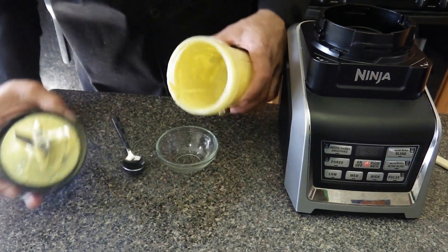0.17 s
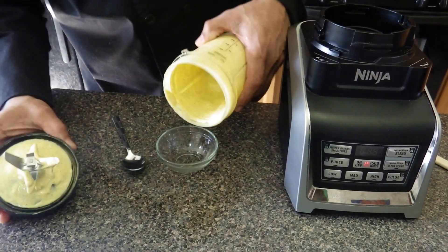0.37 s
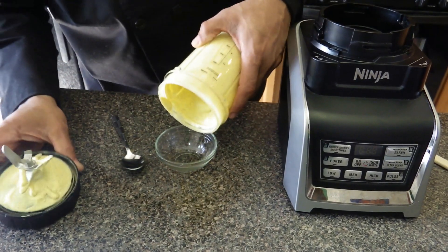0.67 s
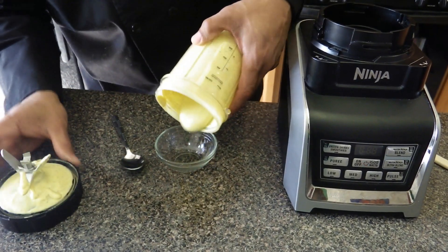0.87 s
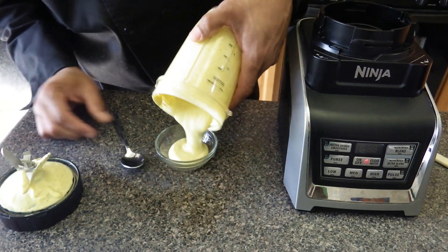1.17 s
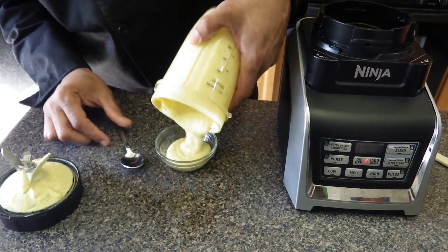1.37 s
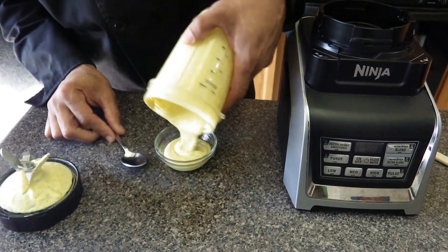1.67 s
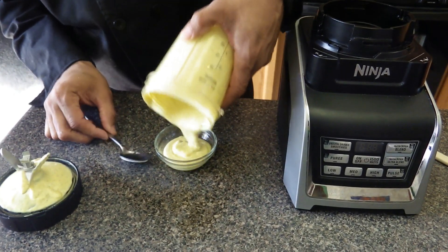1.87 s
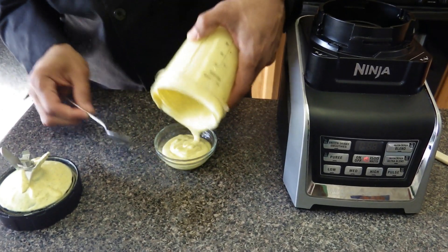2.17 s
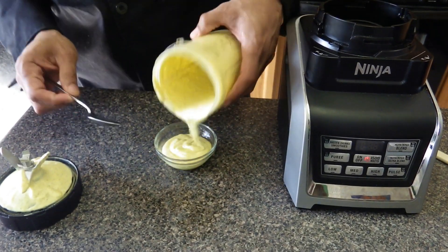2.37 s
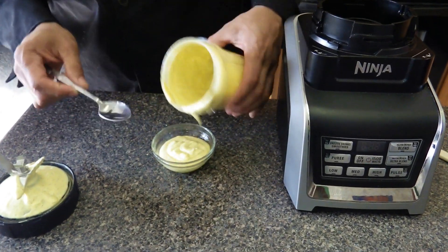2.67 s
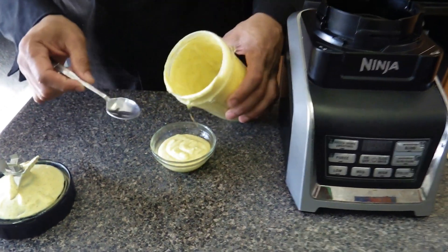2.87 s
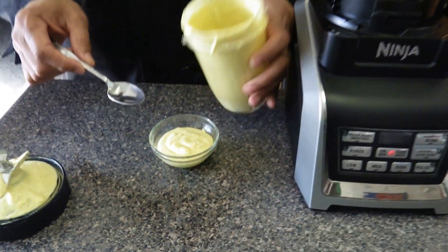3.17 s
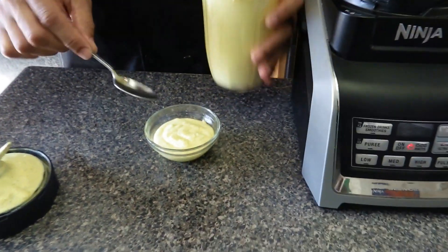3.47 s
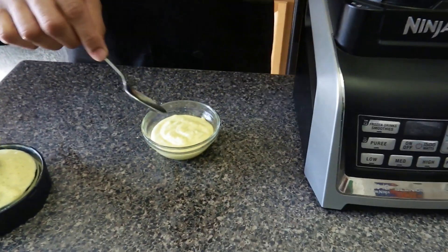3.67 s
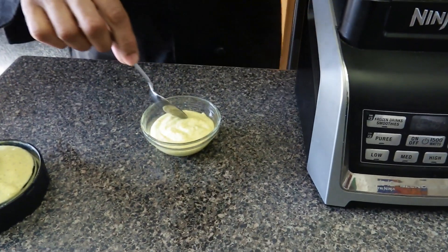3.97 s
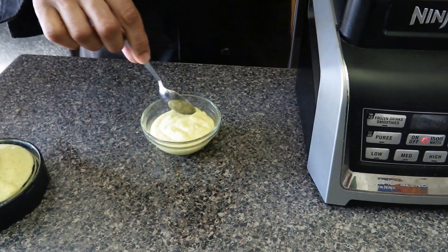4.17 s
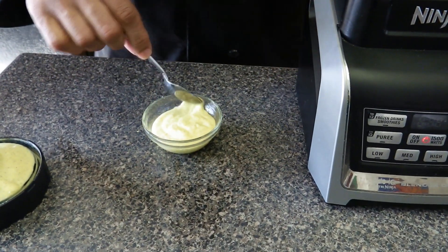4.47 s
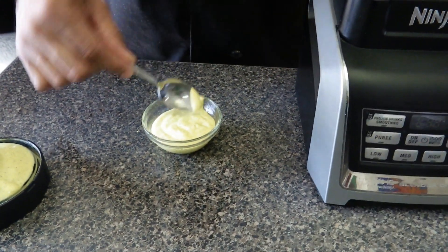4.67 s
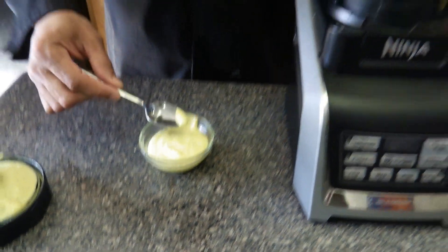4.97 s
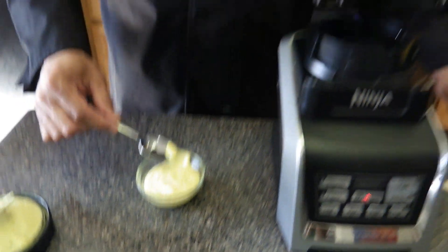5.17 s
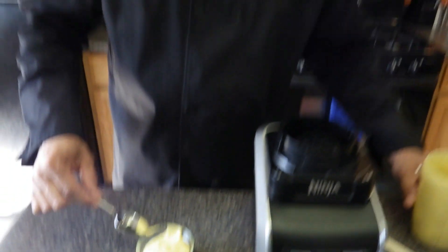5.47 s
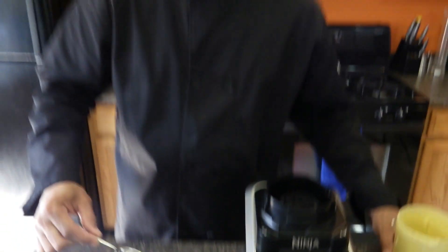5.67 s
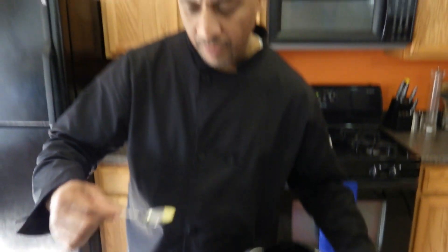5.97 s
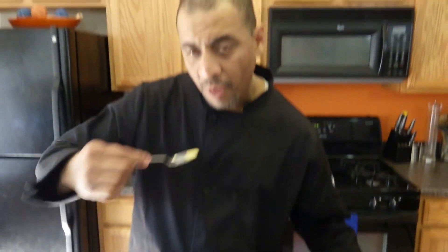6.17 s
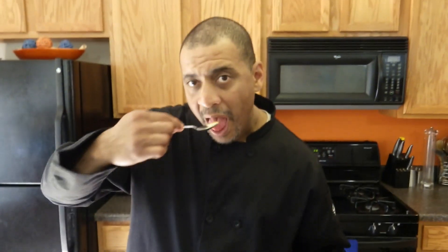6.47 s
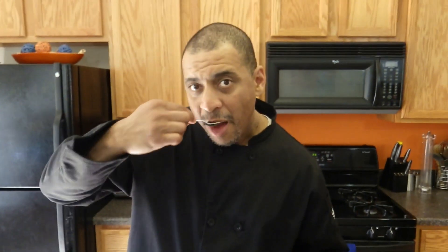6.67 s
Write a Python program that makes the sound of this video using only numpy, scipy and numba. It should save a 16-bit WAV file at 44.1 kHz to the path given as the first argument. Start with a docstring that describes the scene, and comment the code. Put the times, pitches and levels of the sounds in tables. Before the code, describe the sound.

In a small kitchen with a low fridge hum, a plastic lid and cup knock on a counter, then a spoon ticks and clinks sharply on glass.

```python
"""A plastic blender cup and its lid knock on a kitchen counter as struck bodies ringing in damped modes.
A metal spoon slides and ticks, then scrapes faintly and clinks on a small glass bowl, by the same
modal principle. Soft rubs and sleeves are trains of random slips, squeaks are gliding sines, and a
fridge hums in steady lines. One near echo and a diffuse room surround the handling; the recorder's
gain control ducks everything after each loud blow, then creeps back."""
import sys
import numpy as np
from scipy import signal
from scipy.fft import rfft, irfft, next_fast_len
from scipy.io import wavfile
from scipy.ndimage import uniform_filter1d, minimum_filter1d
from numba import njit

SR = 44100
rng = np.random.default_rng(int(sys.argv[2]) if len(sys.argv) > 2 else 0)


def digitize_waveform(pressure):
    """Quantize a signal to 16-bit integers and store it at the path in sys.argv[1].

    Rows of a 2-D input are taken as channels; values are limited to [-1, 1].
    """
    field = np.atleast_2d(pressure).T
    bounded = np.clip(field, -1, 1)
    quanta = np.round(bounded * 32767).astype(np.int16)
    wavfile.write(sys.argv[1], SR, quanta)


N = 300100
TIME = np.arange(N) / SR
BRIEF = TIME[:SR // 2]  # time axis of one decay, 0.5 s


def undb(db):
    """Logarithmic level: decibels to amplitude gain."""
    return 10 ** (np.asarray(db) / 20)


def unit(x):
    """Energy normalisation: the squares sum to one."""
    return x / np.sqrt(np.sum(x ** 2))


def level(x, db):
    """Mean power: scale to an rms level in dB."""
    return unit(x) * np.sqrt(len(x)) * undb(db)


def along(points, hz):
    """Logarithmic pitch scale: interpolate (frequency, value) points on it."""
    point_hz, value = np.transpose(points)
    return np.interp(np.log(np.maximum(hz, 1)), np.log(point_hz), value)


def tint(x, points):
    """Linear filtering: multiply the spectrum of a long sound by a (frequency, level) colour."""
    size = next_fast_len(len(x))
    gain = undb(along(points, np.fft.rfftfreq(size, 1 / SR)))
    return irfft(rfft(x, size) * gain, size)[:len(x)]


def click(points, size=2048):
    """Minimum phase: folding the cepstrum gives the most compact causal pulse of this colour."""
    cepstrum = irfft(np.log(undb(along(points, np.fft.rfftfreq(size, 1 / SR)))))
    cepstrum[1:size // 2] *= 2
    cepstrum[size // 2 + 1:] = 0
    return unit(irfft(np.exp(rfft(cepstrum))))


def fade(t60):
    """Exponential damping: a loss of 60 dB in t60 seconds."""
    return np.exp(-np.log(1000) * BRIEF / t60)


def through(x, response):
    """Superposition: convolve with an impulse response, keeping the length."""
    return signal.fftconvolve(x, response)[:len(x)]


def walk(rate):
    """Random fluctuation: interpolated noise, rate points a second, with a spread near one."""
    steps = rng.standard_normal(4096)
    return np.sqrt(3 / 2) * np.interp(TIME * rate, np.arange(len(steps)), steps)


def add(track, s, x):
    """Superposition: lay a sound into a track at a time in seconds."""
    i = int(s * SR)
    track[i:i + len(x)] += x[:N - i]


def grains(rate, spread_db):
    """Stick-slip noise: random tiny slips of uneven size, rate a second on average."""
    occurs = rng.random(N) < rate / SR
    return occurs * rng.standard_normal(N) * undb(spread_db * rng.exponential(size=N))


def stroke(s, length_s):
    """Friction follows speed: one movement gathers, peaks at s and dies away, 0-1."""
    return np.exp(-(2 * (TIME - s) / length_s) ** 2)


def strokes(table):
    """Friction follows speed: the loudness of a series of movements."""
    return sum(undb(db) * stroke(s, length_s) for s, length_s, db in table)


FOCUS_DB = 13  # loss per octave of the modes away from the ring centre


def ring(modes, centre_hz):
    """Modal superposition: decaying sines, weighted by their distance from a centre frequency."""
    total = 0
    for hz, db, t60 in modes:
        octaves_away = abs(np.log2(hz / centre_hz))
        total = total + undb(db - FOCUS_DB * octaves_away) * fade(t60) * np.sin(2 * np.pi * hz * BRIEF)
    return unit(total)


# Compressor and mains lines: (frequency [Hz], mean level before a common 1 dB cut [dB])
HUM_LINES = [(59.2, -54), (145.3, -49.5), (183.0, -52.5), (220.7, -55), (290.7, -57), (328.4, -58.5),
             (398.4, -62), (436.0, -57), (473.7, -56), (543.7, -60.5), (656.8, -63.5)]
# Colour of the room's steady air: (frequency [Hz], relative level [dB])
AIR_COLOUR = [(13, -35), (22, -19.5), (59, -5.5), (111, -11), (142, -0.5), (187, -11.5), (220, 4),
              (260, -13), (324, -4), (475, -11), (516, -10), (717, -9.5), (779, -17), (5770, -25.5),
              (15500, -36)]
AIR_DB = -44.5  # mean level


def fridge():
    """Line spectrum over broadband noise: compressor and mains lines waver over the room's air."""
    hum = np.zeros(N)
    for hz, db in HUM_LINES:
        amplitude = np.sqrt(2) * undb(db + 0.52 * walk(3.4))
        phase = 2 * np.pi * (hz * TIME + rng.random()) + 0.2 * walk(1.5)
        hum += amplitude * np.sin(phase)
    air = level(tint(rng.standard_normal(N), AIR_COLOUR), AIR_DB)
    return undb(-1.0) * hum + air * undb(0.15 * walk(6.6))


# Reverberation time of the room: (frequency [Hz], t60 [s])
ROOM_T60 = [(100, 0.75), (300, 0.4), (1000, 0.46), (3000, 0.38), (8000, 0.22), (15000, 0.3)]


def kitchen(x):
    """Diffuse reverberation: noise bands build up over a few ms, then decay at their own rates."""
    hz = np.fft.rfftfreq(len(BRIEF), 1 / SR)
    noise = rfft(rng.standard_normal(len(BRIEF)))
    centres_hz, t60s = np.transpose(ROOM_T60)
    tail = np.zeros(len(BRIEF))
    for share, t60 in zip(np.eye(len(t60s)), t60s):
        band = irfft(noise * along(np.c_[centres_hz, share], hz), len(BRIEF))
        tail += band * fade(t60)
    build_up = 1 - np.exp(-(BRIEF / 0.0059) ** 2)
    return through(x, unit(tail * build_up))


# Thin squeaks: (middle [s], length [s], peak amplitude before flutter [dB])
SQUEAKS = [(.2, 0.12, -51), (.36, 0.17, -47.5), (2.34, 0.18, -57), (2.58, 0.15, -56)]
# Their gliding pitch: (time [s], mean frequency [Hz])
SQUEAK_PITCH = [(.12, 5530), (.24, 7100), (.29, 6580), (.42, 6370), (2.33, 4650), (2.46, 4300),
                (2.56, 4620), (2.7, 4250)]


def squeak():
    """Frequency modulation: faint sines glide and tremble as they rise and fall in level."""
    hz = np.interp(TIME, *np.transpose(SQUEAK_PITCH)) * (1 + 0.0073 * walk(300))
    tone = np.sin(2 * np.pi * np.cumsum(hz) / SR)
    return tone * strokes(SQUEAKS) * undb(2.7 * walk(49))


# A sleeve rubs with each arm movement: (middle [s], length [s], level before flutter [dB])
SLEEVE_RUBS = [(.43, 0.58, -46), (1.14, 0.3, -42.5), (2.34, 0.51, -47.5), (3.5, 0.17, -52.5),
               (3.74, 0.17, -47.5), (3.93, 0.2, -55.5), (5.45, .4, -48.5), (6.72, 0.61, -58)]
# Colour of the sleeve: (frequency [Hz], relative level [dB])
CLOTH_COLOUR = [(400, -8.5), (1500, 0.5), (3000, -1), (6000, 4), (8000, -2.5), (10000, -13), (12500, -14),
                (15500, -20.5)]
# Quick brushes as the hand leaves the lid: (middle [s], length [s], level before flutter [dB])
BRUSHES = [(1.12, .2, -44.5), (1.26, 0.15, -50.5)]
# Their brighter colour: (frequency [Hz], relative level [dB])
BRUSH_COLOUR = [(2000, -28), (5500, -6), (8000, -0.5), (10500, -7), (12200, -7), (14000, -9.5),
                (15500, -17)]


def sleeves():
    """Stick-slip friction: cloth fibres catch and let go, heard as coloured grains."""
    rustle = level(tint(grains(rate=9000, spread_db=2.0), CLOTH_COLOUR), 0) * strokes(SLEEVE_RUBS)
    brush = level(tint(grains(rate=11000, spread_db=2.0), BRUSH_COLOUR), 0) * strokes(BRUSHES)
    return (rustle + brush) * undb(1.0 * walk(27))


# The lid's rim drags and catches just before it drops: (middle [s], length [s], relative level [dB])
LID_DRAG = [(.63, .09, -35), (.81, 0.28, -44), (.899, .018, -21)]
# Contact colour of the lid's edge: (frequency [Hz], relative level [dB])
LID_EDGE = [(50, -37.5), (100, -5.5), (230, -21), (440, 3.5), (600, -13), (800, -0.5), (1080, -7),
            (1400, 1), (1900, -2.5), (2500, -3.5), (3300, -6), (5500, -6.5), (7500, -21), (10000, -35.5),
            (15000, -31)]
# Modes of the lid: (frequency [Hz], level before ring weighting [dB], t60 [s])
LID_MODES = [(222, 1.5, 0.092), (292, -12, 0.076), (389, 3.5, 0.09), (520, -7, 0.036), (740, 0, 0.027),
             (1480, -8.5, 0.019), (2713, -19, 0.02), (3350, -8.5, 0.021)]
# Soft toned rubs of hand or sleeve, the last one breath-like: (middle [s], length [s], level [dB])
SOFT_RUBS = [(.3, 0.27, -54), (1.93, .09, -48), (2.1, 0.083, -45.5), (2.48, 0.3, -51), (6.65, 0.28, -52)]
# Their broad tones: (frequency [Hz], level before ring weighting [dB], t60 [s])
RUB_TONES = [(1508, 3.5, 0.022), (1940, -10, 0.033), (4480, 7, 0.0028)]


def dragging():
    """Friction-excited modes: slips rasp at the lid's edge and shake it; softer rubs have broad tones."""
    slips = grains(rate=1900, spread_db=0)
    lid_ring = level(through(slips, ring(LID_MODES, centre_hz=900)), -4.5)
    lid_rasp = level(tint(slips, LID_EDGE), -11)
    rub_slips = grains(rate=11000, spread_db=2.0)
    rub = level(through(rub_slips, ring(RUB_TONES, centre_hz=2512)), 0)
    return (lid_ring + lid_rasp) * strokes(LID_DRAG) + rub * strokes(SOFT_RUBS)


# Short strokes of the spoon on the counter: (middle [s], length [s], relative level [dB])
SLIDE_STROKES = [(1.785, 0.074, -41), (1.85, 0.038, -51), (1.95, 0.23, -58.5), (2.09, 0.066, -45.5)]
# Contact colour of the tip on the counter: (frequency [Hz], relative level [dB])
TIP_ON_COUNTER = [(88, -48), (150, -8), (409, -5), (802, -5.5), (2650, 0), (4720, -14), (5610, -10.5),
                  (6550, -12.5), (9270, -25), (12100, -27), (15000, -61.5)]
# Modes of the spoon: (frequency [Hz], level before ring weighting [dB], t60 [s])
SPOON_MODES = [(1880, -10.5, 0.024), (3015, -12.5, 0.046), (3484, -13, 0.046), (4350, -26, .09),
               (4900, -14.5, .08), (4770, -6, 0.055), (6420, 4.5, 0.037), (6430, -15, .17), (8240, -8, .06),
               (8600, -13.5, 0.14), (10170, -16.5, 0.14), (11890, -6.5, .075), (12900, -21.5, 0.046)]


def spoon_slide():
    """Friction-excited modes: the counter's grain rasps under the spoon and keeps it ringing."""
    slips = grains(rate=3500, spread_db=-1.0)
    scoop_ring = level(through(slips, ring(SPOON_MODES, centre_hz=12300)), 0)
    handle_ring = level(through(slips, ring(SPOON_MODES, centre_hz=2300)), -4.5)
    rasp = level(tint(slips, TIP_ON_COUNTER), -6)
    return (scoop_ring + handle_ring + rasp) * strokes(SLIDE_STROKES)


def contacts(table, modes):
    """Contact excitation: click, damped clatter and modal ring; gives direct sound and room feed."""
    direct, feed = np.zeros(N), np.zeros(N)
    for s, db, ring_db, centre_hz, clatter_db, clatter_t60, room_db, contact in table:
        pulse = click(contact)
        clatter = unit(through(rng.standard_normal(len(BRIEF)) * fade(clatter_t60), pulse))
        pulse = np.pad(pulse, (0, len(BRIEF) - len(pulse)))
        tone = undb(ring_db) * ring(modes, centre_hz)
        hit = pulse + undb(clatter_db) * clatter + tone
        gain = undb(db) * np.sqrt(SR / 100 / np.sum(hit ** 2))  # level as if spread over 10 ms
        add(direct, s, gain * hit)
        # the room is fed a smooth pulse carrying the energy of click and clatter, plus the ring 5 dB down
        even_pulse = pulse * np.hypot(1, undb(clatter_db))
        add(feed, s, gain * undb(room_db) * (even_pulse + undb(-5.0) * tone))
    return np.array([direct, feed])


# Contact colours of the spoon's tip in the bowl and of a light tick: (frequency [Hz], relative level [dB])
TIP_IN_BOWL = [(90, -47), (200, -24.5), (900, -8), (1600, -19.5), (2750, -9), (3750, -20.5), (4400, -8.5),
               (5300, -7.5), (5900, -25), (6500, -12), (8200, -14), (9600, -24), (15000, -36)]
LIGHT_TICK = [(200, -49), (900, 4), (1150, -4), (1500, 3.5), (2200, -15), (3300, 4.5), (3900, -18),
              (6000, -16), (14000, -29)]
# Blows: (time [s], level over 10 ms [dB], ring re click [dB], ring centre [Hz],
#         clatter re click [dB], clatter t60 [s], room feed [dB], contact colour)
SPOON_BLOWS = [ (2.169, -22, -3, 10200, 0.33, 0.034, -6, TIP_ON_COUNTER),
               (2.1852, -29.5, -9, 2200, 3.7, 0.021, -9.5, TIP_ON_COUNTER),
               (4.0449, -11, 0.5, 6670, 2.5, 0.013, -18, TIP_IN_BOWL),
               (4.053, -22.5, -12, 6440, 2.8, 0.0095, -5.5, TIP_IN_BOWL),
               (4.2345, -37, -10, 8300, 5.4, 0.0053, -11.5, TIP_IN_BOWL),
               (6.1925, -36.5, -26, 3440, 7.4, 0.012, -9, LIGHT_TICK),
               (6.1955, -35, -19, 2970, 1, 0.039, -10.5, LIGHT_TICK)]


def spoon_blows():
    """Impact excitation of a metal bar: the spoon ticks on the counter and in the bowl."""
    return contacts(SPOON_BLOWS, SPOON_MODES)


# Contact colours of the spoon's tip and back on the rim: (frequency [Hz], relative level [dB])
TIP_ON_RIM = [(90, -55), (150, -33), (450, -34.5), (1000, -10), (1400, -18.5), (3100, -8), (3600, -18),
              (4500, -2.5), (5900, -5.5), (6700, -28), (7800, 4), (9300, -38.5), (15000, -47.5)]
BACK_ON_RIM = [(100, -25), (300, -20), (700, -1.5), (1300, -11.5), (2300, -12), (3300, -1), (4100, -8),
               (5300, 3.5), (6400, -1), (7400, -23), (8050, -12.5), (8500, 3), (9300, -8.5), (10800, -33),
               (12100, -15.5), (15500, -30.5)]
# Modes of the glass bowl: (frequency [Hz], level before ring weighting [dB], t60 [s])
BOWL_MODES = [(4400, -10.5, .15), (4430, -6.5, .12), (4860, 11, .03), (5440, -4, 0.028), (7800, -13.5, .25),
              (8000, -14.5, .3), (7760, -15.5, 0.34), (7930, -11.5, 0.41), (7980, -13, .27),
              (7900, 2.5, .04), (8200, -13, .22), (8274, -5.5, .13), (12000, -13.5, .1),
              (12120, -17.5, .15)]
# Scrapes and blows: (time [s], level over 10 ms [dB], ring re click [dB], ring centre [Hz],
#                    clatter re click [dB], clatter t60 [s], room feed [dB], contact colour)
BOWL_CONTACTS = [ (4.595, -46.5, 16, 5020, 13, 0.075, -12.5, TIP_ON_RIM),
                 (4.639, -44.5, 5, 7030, 16, 0.054, -14.5, TIP_ON_RIM),
                 (4.6674, -12, -9, 6400, 2, 0.037, -14, TIP_ON_RIM),
                 (4.694, -27, 2, 4540, 21, 0.058, -18, TIP_ON_RIM),
                 (4.719, -33.5, -5, 4400, -14, .02, -34, TIP_ON_RIM),
                 (5.1855, 7.5, -2, 8600, 5, 0.0052, -16, BACK_ON_RIM)]


def bowl_scrapes_and_blows():
    """Modal excitation of a glass shell: the spoon scrapes faintly on the glass bowl and clinks."""
    return contacts(BOWL_CONTACTS, BOWL_MODES)


# Contact colour of the lid landing flat: (frequency [Hz], relative level [dB])
LID_FLAT = [(50, -32), (100, -4), (200, -1), (400, 1), (620, 0), (1200, -9), (2100, -23.5), (2600, -16),
            (3400, -12.5), (4000, -18.5), (5700, -18), (9000, -30.5), (15000, -49)]
# Blows: (time [s], level over 10 ms [dB], ring re click [dB], ring centre [Hz],
#         clatter re click [dB], clatter t60 [s], room feed [dB], contact colour)
LID_BLOWS = [ (.419, -35, 1, 2420, -6.5, 0.017, -7, LID_EDGE),
             (.4722, -13.5, -3.5, 298, 4.5, 0.015, -9, LID_FLAT),
             (.4945, -30.5, 5.5, 1390, 11.5, 0.044, -23.5, LID_EDGE),
             (.9008, -11.5, -0.5, 700, 17, 0.035, -16, LID_EDGE),
             (.9043, -7, -17, 2430, 3, 0.013, -8, LID_EDGE),
             (.9327, -15.5, -4.5, 2560, 12, .022, -14, LID_EDGE)]


def lid_blows():
    """Impact excitation of a damped plate: the lid knocks on the counter, flat or on its edge."""
    return contacts(LID_BLOWS, LID_MODES)


# Contact colours of the cup bumped, set down and on its rim: (frequency [Hz], relative level [dB])
CUP_BUMP = [(40, -45), (120, 13), (200, 4.5), (340, -6), (460, -12), (640, -0.5), (820, -9.5), (1050, -13),
            (1300, -10), (1900, -27), (2800, -22), (4700, -32.5), (6700, -23), (8000, -84), (15000, -91)]
CUP_DOWN = [(45, -38), (110, -23.5), (200, -2.5), (270, 2.5), (390, -18), (510, -5), (730, -21), (970, -13),
            (1750, -21.5), (2800, -21), (4000, -22), (6800, -22.5), (15000, -48)]
CUP_RIM = [(45, -37), (110, -14), (270, -0.5), (480, -10.5), (660, 0), (820, -6.5), (1440, -14.5),
           (1750, -21.5), (2400, -19.5), (3400, -23.5), (4600, -32), (8000, -40), (15000, -68)]
# Modes of the cup: (frequency [Hz], level before ring weighting [dB], t60 [s])
CUP_MODES = [(120, -9, .28), (204, -10, 0.23), (280, -6.5, 0.23), (330, -12.5, 0.068), (454, -3, 0.052),
             (604, -1.5, 0.088), (683, -1.5, .05), (1230, -11, .04)]
# Blows: (time [s], level over 10 ms [dB], ring re click [dB], ring centre [Hz],
#         clatter re click [dB], clatter t60 [s], room feed [dB], contact colour)
CUP_BLOWS = [ (2.936, -35, 23, 430, 2, .1, 1.5, CUP_BUMP), (3.0079, -7, -1.5, 490, 1, 0.017, -13, CUP_BUMP),
             (3.0112, -4, -1, 457, -6.5, 0.0039, -11, CUP_BUMP),
             (4.1022, -6.5, -15, 500, 24, 0.03, -28, CUP_DOWN),
             (4.1038, -2, 6.5, 239, 11.5, 0.033, -6.5, CUP_DOWN),
             (5.0068, -1.5, 4.5, 680, 7.5, 0.014, -11.5, CUP_RIM),
             (5.258, -10.5, 18, 560, 14, 0.11, -2, CUP_RIM)]


def cup_blows():
    """Impact excitation of a hollow shell: the plastic cup knocks with low modes."""
    return contacts(CUP_BLOWS, CUP_MODES)


ECHO_S, ECHO_DB = 0.0087, -20.5  # delay and level of the near echo
BASS_HZ = 89  # high-pass corner of the handling


def scene():
    """Superposition: contacts and rubbing, one near echo, the room and its hum."""
    direct, feed = lid_blows() + cup_blows() + spoon_blows() + bowl_scrapes_and_blows()
    rubbing = spoon_slide() + dragging() + sleeves() + squeak()
    echo = undb(ECHO_DB) * np.interp(TIME - ECHO_S, TIME, direct)
    handling = direct + echo + rubbing + kitchen(feed + undb(-10.5) * rubbing)
    # the handling sounds carry no deep bass
    bass_cut = signal.butter(2, BASS_HZ, "high", fs=SR, output="sos")
    handling = signal.sosfilt(bass_cut, handling)
    return (handling + fridge())[None]


@njit
def duck(over_db, attack, hold, release):
    """Gain control: the cut in dB jumps on an overload, waits, then shrinks at a steady pace."""
    cut, now, wait = np.zeros(len(over_db)), 0., 0.
    for i in range(len(over_db)):
        wait -= 1
        if over_db[i] > now:
            now += attack * (over_db[i] - now)
            wait = hold
        elif wait < 0:
            now = max(now - release, 0.)
        cut[i] = now
    return cut


TOP_HZ = 15800  # upper band limit


def record(dry, ceiling_db=-5.5, attack_s=0.00026, hold_s=0.25, release_db_per_s=23):
    """Dynamic compression: loud blows duck the gain; peaks are limited and clipped, the top is cut."""
    over_db = 20 * np.log10(np.abs(dry[0]) + 1e-9) - ceiling_db
    attack = 1 - np.exp(-1 / (attack_s * SR))
    cut_db = duck(over_db, attack, float(hold_s * SR), release_db_per_s / SR)
    ducked = dry * undb(-cut_db)
    headroom = np.minimum(1, 1.15 / (np.abs(ducked) + 1e-9))
    limited = ducked * uniform_filter1d(minimum_filter1d(headroom, size=13), size=13)
    clipped = np.clip(limited, -.78, .78)
    top_cut = signal.ellip(8, .1, 50, TOP_HZ, fs=SR, output="sos")
    return signal.sosfiltfilt(top_cut, clipped)


dry = scene()
out = record(dry)
digitize_waveform(out)
```